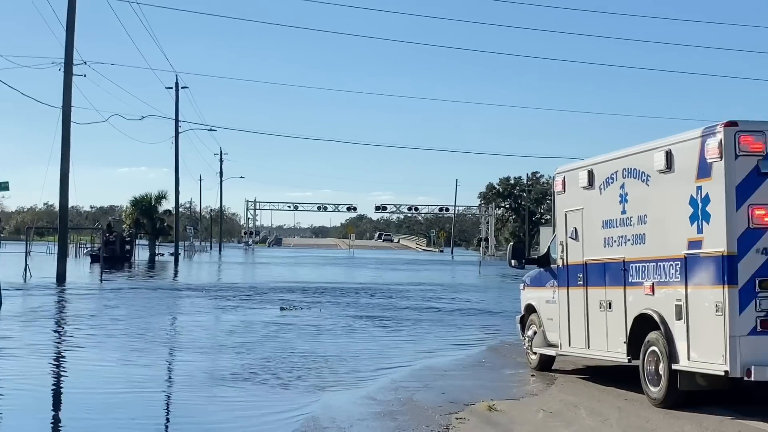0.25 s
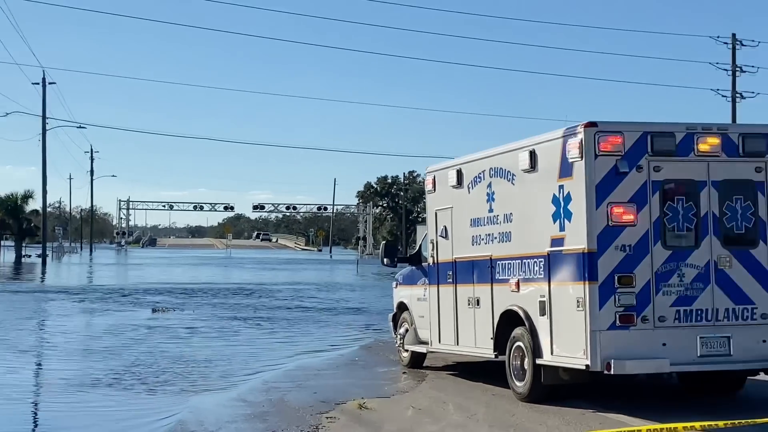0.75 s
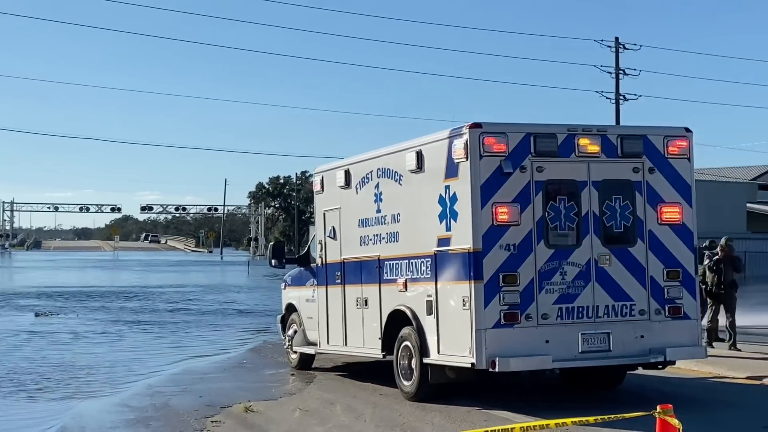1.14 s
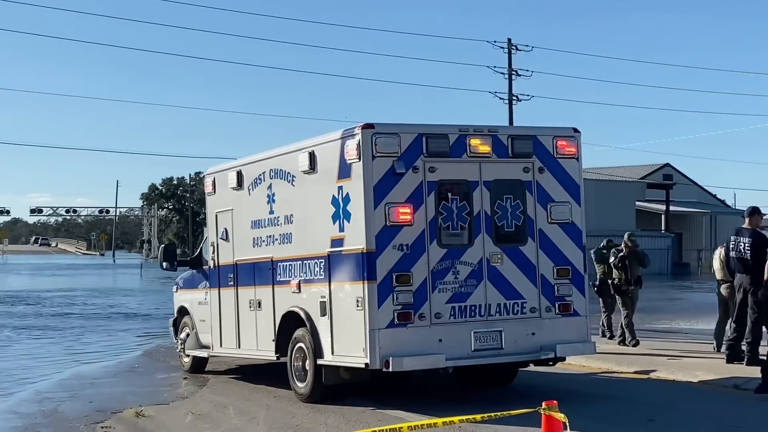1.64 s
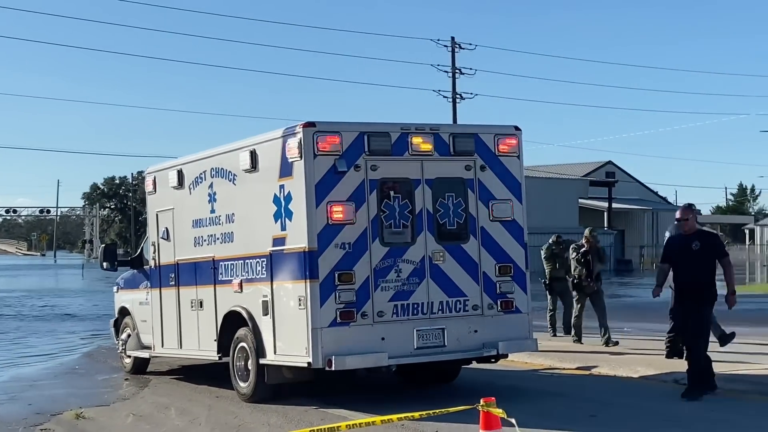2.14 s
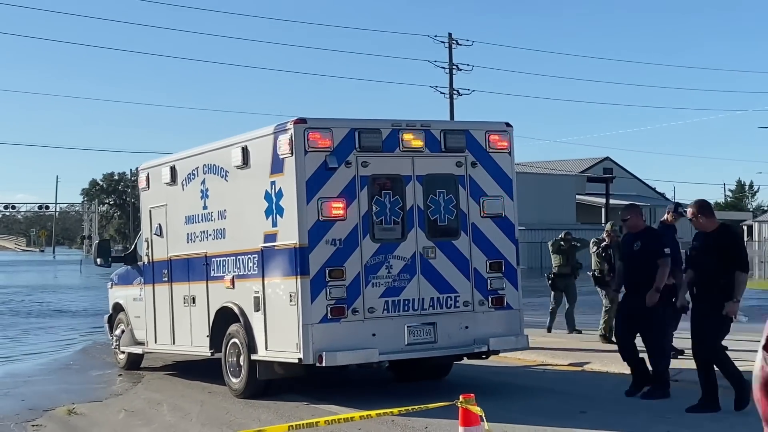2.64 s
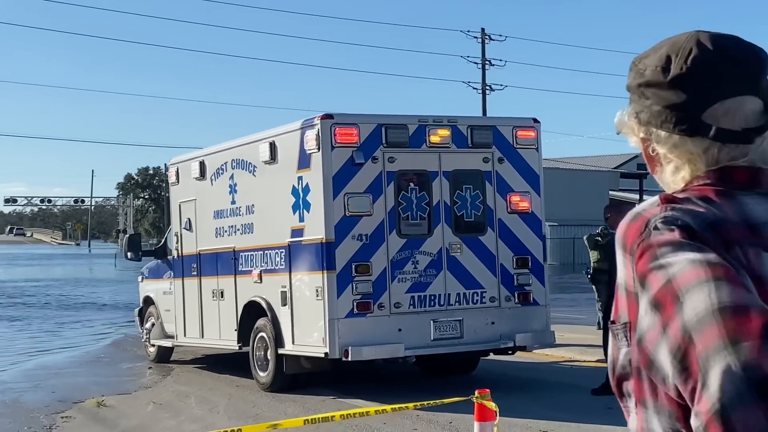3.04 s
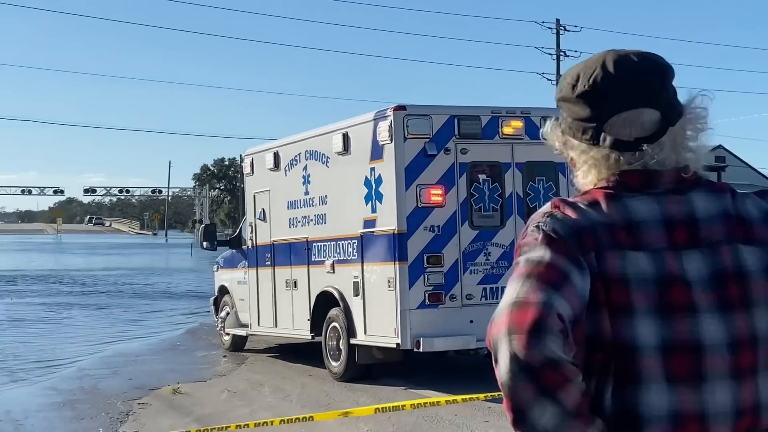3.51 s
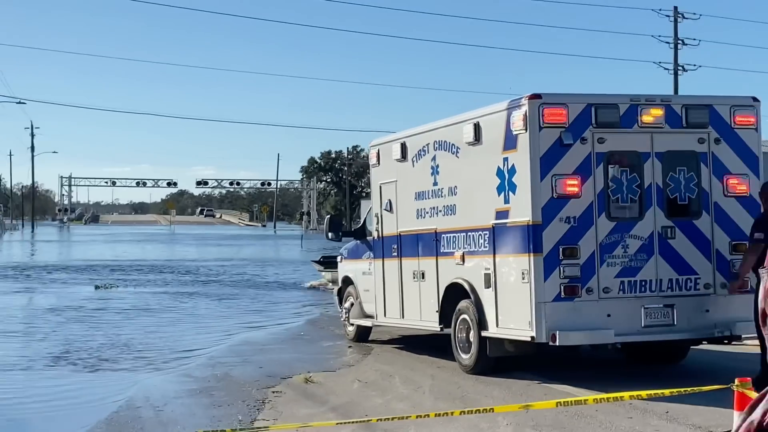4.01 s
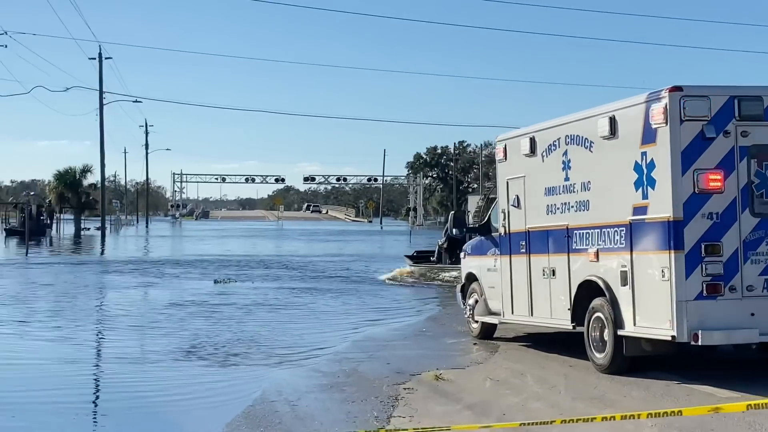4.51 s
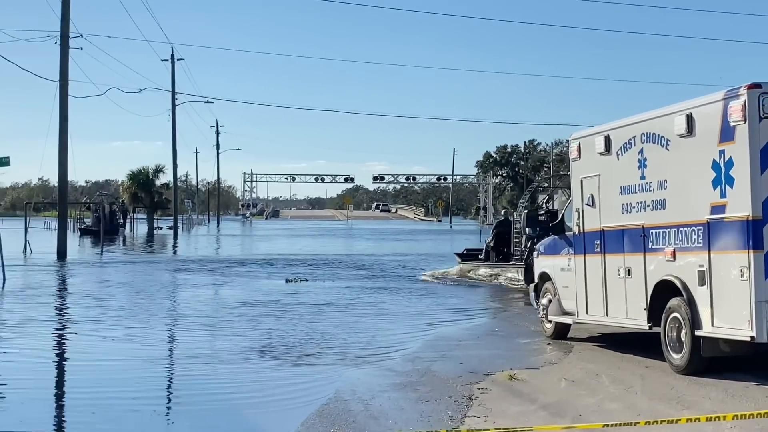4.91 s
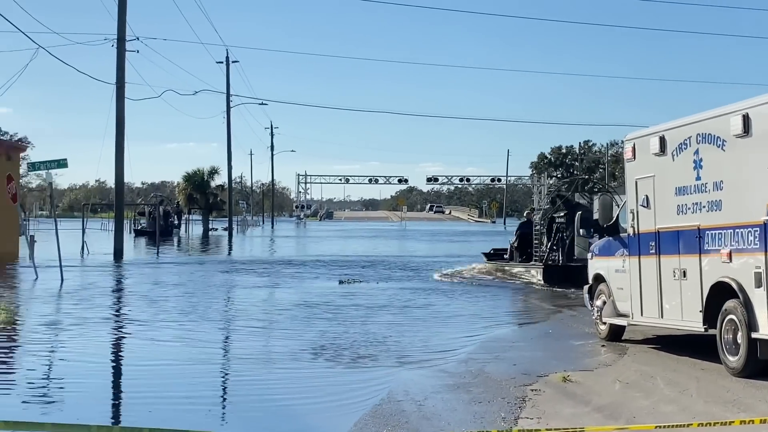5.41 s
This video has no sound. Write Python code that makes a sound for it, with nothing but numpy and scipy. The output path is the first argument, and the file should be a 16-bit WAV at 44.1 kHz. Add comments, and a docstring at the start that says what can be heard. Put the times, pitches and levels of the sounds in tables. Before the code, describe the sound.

An airboat revs and runs off across floodwater, heard loudly from the shore in open-air stereo. At 0 s the open-piped V8 is already running; a stab of throttle makes the exhaust bark around 0.2 s, and the ragged, sputtering note climbs rapidly until about 1.2 s. Churning low air and a strong blade throb join a burst of rasp near 0.55 s. From 1.2 to 2 s it holds a smoother, full-power roar with bright buzzing rasp and broad blade hiss. Between 2 and 3 s the throttle eases, pitch sinking slightly, rasp softening and a deep boom strengthening. The hiss is duller while a parked vehicle masks the boat. From 3 to 5.6 s a steady cruising drone continues, wavering with reflections. After about 4.2 s rough, surging propeller wash emerges; near 4.6 s the low end drops slightly, and the treble opens by 5 s, still roaring at the end.

```python
"""Airboat leaving across floodwater

Heard from the shore: an airboat opens its throttle, revs up, eases to cruising and runs off.
A V8 with open pipes drones in multiples of its firing cycle and drives a geared three-blade propeller.
Exhaust gas roars in time with the cycle, the blades hiss, and their wash grows as the stern swings round.
Vehicles, walls and water scatter the sound to a stereo microphone, so single tones swell and fade."""
import sys
import numpy as np
from scipy import signal
from scipy.fft import rfft, irfft
from scipy.io import wavfile
from scipy.ndimage import uniform_filter1d, minimum_filter1d

SR = 44100
rng = np.random.default_rng(int(sys.argv[2]) if len(sys.argv) > 2 else 0)


def wav_out(sig):
    """Save sig, one row per channel (or a flat mono array), as 16-bit PCM at SR to the path in sys.argv[1]."""
    wavfile.write(sys.argv[1], SR, np.round(np.clip(np.atleast_2d(sig).T, -1, 1) * 32767).astype(np.int16))


N = 249606
TIME = np.arange(N) / SR
FREQS = np.fft.rfftfreq(N, 1 / SR)

# Spread of the reflections over the stereo field. Each row: pitch in Hz, side against mid in dB.
WIDTH = [(60, -24), (180, -25), (380, -9.5), (650, -7), (1500, -5), (2000, -11), (2600, -98), (6500, -59),
         (8200, -72), (15000, -41)]
# Air and spray at the blade tips. Each row: pitch in Hz, relative density in dB per Hz.
HISS_COLOUR = [(700, -56), (1900, 2.5), (2700, 1), (3200, 2.5), (4300, 3), (5500, 0.5), (7000, 0),
               (9000, -2.5), (11000, -1), (13000, -3), (15500, -6.5)]
# Top of the hiss, duller while a parked vehicle hides the boat. Each row: time in seconds, gain in dB.
OPENNESS = [(0, -2.5), (.7, -5.5), (1.3, -1), (2.25, -7.5), (3.3, -5), (4.4, -5.5), (5, -1), (5.66, -0.5)]
# Low churn behind the propeller. Each row: pitch in Hz, relative density in dB per Hz.
CHURN_COLOUR = [(25, -48), (40, -25), (60, -8.5), (110, -17), (200, -24), (300, -20), (400, -20.5),
                (600, -32), (1500, -92)]
# Wash from the stern. Each row: pitch in Hz, relative density in dB per Hz.
WASH_COLOUR = [(350, -10), (720, 1), (1050, 0), (1600, -9), (2200, -8), (3500, -32)]
# Propeller tones in the wash. Each row: multiple of the blade rate, level in dB before wavering.
STERN_TONES = [(5, -33.5), (10, -36.5), (11, -39)]
# Overtones of the blades. Each row: multiple of the blade rate, base level in dB at full throttle,
# base level in dB when cruising.
BLADE_OVERTONES = [(3, -36.5, -31.5), (4, -28.5, -35), (5, -33.5, -34), (6, -34.5, -40.5), (7, -38, -43.5),
                   (8, -35.5, -41), (9, -48, -49.5), (10, -38, -47), (11, -47, -59), (12, -46.5, -46.5)]
# Short swells of rasp, each in one band. Each row: time in seconds, centre in Hz, peak level in dB,
# width in seconds.
RASP_SWELLS = [(2.2, 1590, -31, 0.15), (2.55, 1870, -34.5, .14), (2.7, 1045, -34, 0.32),
               (2.95, 1520, -34.5, 0.11), (3.32, 990, -36, 0.21), (3.36, 1560, -38.5, .12),
               (3.72, 1620, -40.5, 0.21), (3.9, 1240, -35.5, 0.076), (4.28, 1004, -37, 0.19),
               (4.5, 1770, -42, 0.22), (4.68, 820, -34, 0.092), (5.3, 725, -32, 0.13),
               (5.6, 1320, -36, 0.15)]
# Turbulent exhaust jets. Each row: pitch in Hz, relative density in dB per Hz.
ROAR_COLOUR = [(150, 2.5), (330, -14), (480, 3.5), (580, 5), (700, 0.5), (1100, -27), (2500, -96)]
# Exhaust rasp. Each row: pitch in Hz, relative density in dB per Hz.
RASP_COLOUR = [(400, -3), (750, 5), (900, 2.5), (1020, 6.5), (1160, 2.5), (1300, 3.5), (1600, 1),
               (2100, -5.5), (3000, -5.5), (6000, -23)]
# Bright band in the rasp that shifts in pitch and strength. Each row: time in seconds, centre in Hz,
# gain in dB.
GLARE = [(0, 1060, 15), (.6, 1230, 4), (1.2, 1900, 1.5), (2.2, 1710, 2.5), (2.6, 1720, 10),
         (3.3, 1222, 2.5), (5.66, 760, -2)]
# Load on engine and blades; roar and pipe tones swell with it too. Each row: time in seconds,
# base level of the rasp in dB, base level of the hiss in dB.
LOAD = [(0.03, -32, -33), (0.25, -26.5, -33), (0.5, -25, -29.5), (0.55, -19, -30.5), (0.62, -22, -27.5),
        (0.72, -22, -28.5), (1.1, -23, -29.5), (1.3, -24.7, -32.5), (1.59, -26.7, -33.5), (1.9, -26, -31.5),
        (2.33, -26.5, -31), (2.7, -30.5, -34.5), (3.3, -32, -37), (3.5, -35.5, -38.5), (4.21, -30, -35.5),
        (5.01, -34, -35), (5.58, -29.5, -32.5)]
# Orders sounded by uneven firing. Each row: multiple of the cycle, base level in dB at full throttle,
# when cruising, and at the first stab of the throttle.
UNEVEN = [(2, -36, -32, -28), (3, -18, -25, -16), (4, -35, -52, -24), (6, -26, -24, -32),
          (7, -41, -43, -21), (10, -28, -34.5, -31), (11, -29.5, -25.5, -13.5), (12, -34.5, -38, -23),
          (13, -33, -23.5, -26), (14, -35, -39, -27), (15, -32, -42, -26), (17, -30.5, -38.5, -41),
          (18, -40, -30, -47.5), (19, -40, -39, -46), (20, -31.5, -42, -32), (21, -44, -38, -34),
          (23, -48, -53, -40), (25, -40, -45, -37)]
# Single orders swell or drop out as reflections reinforce or cancel them. Each row: time in seconds,
# multiple of the cycle, change in dB, width in seconds.
FADES = [(0.03, 15, 13, .05), (0.15, 11, -15, .022), (0.15, 7, 8, .05), (0.2, 11, 7, 0.082),
         (0.36, 11, -9, .04), (0.35, 13, 9, .07), (0.2, 9, -14, 0.1), (0.47, 9, -6, 0.073),
         (0.5, 8, -3, 0.22), (0.62, 9, 3.5, 0.069), (0.78, 8, 1, 0.1), (0.9, 6, -18, 0.13),
         (1.0, 12, 10.5, 0.21), (1.02, 8, 3.5, 0.18), (1.3, 9, -16, 0.11), (1.4, 16, 5, 1),
         (1.5, 8, -4.5, 0.47), (1.95, 9, 3.5, 0.19), (2.15, 14, 6.5, 0.43), (2.35, 6, 6.5, 0.29),
         (2.42, 11, 6, 0.093), (2.95, 11, -8, 0.2), (2.42, 8, -7, 0.053), (2.55, 16, -4.5, 0.12),
         (2.68, 9, -3, 0.13), (2.85, 13, -33, 0.26), (3.8, 3, 2, 0.33), (3.88, 9, 5, 0.16),
         (3.9, 17, 10.5, 0.56), (3.95, 13, -8, 0.25), (4.35, 8, 2, 0.24), (4.37, 9, -9.5, 0.074),
         (4.35, 13, 3, 0.12), (4.8, 9, -5, 0.15), (4.85, 8, -2.5, 0.21), (4.5, 6, -14, 0.46),
         (4.7, 18, 5, 0.19), (4.9, 16, -18, 0.21), (5.2, 9, -4.5, 0.19), (5.4, 13, -10, 0.14),
         (5.4, 12, 10.5, 0.26)]
# The booming fifth order. Each row: time in seconds, base level in dB.
BOOM = [(0, -17), (.17, -30), (.38, -15), (.7, -20), (1, -27.5), (1.5, -19), (2, -21.5), (2.35, -15),
        (2.8, -12.5), (3.08, -15), (3.25, -14), (4.4, -13), (5.66, -14.3)]
# The eight firings, the order that beats with them, and two overtones. Each row: multiple of the cycle,
# base level in dB at full throttle, when cruising, start of easing in seconds, dB per dB of rasp.
PIPE_TONES = [(8, -20.5, -20, 2.9, 0.47), (9, -25.5, -20.5, 2.8, 0.06), (16, -28, -27.5, 4.7, 0),
              (24, -31.5, -46, 1.44, 1)]
# Engine speed. Each row: time in seconds, engine cycles per second.
SPEED = [(0.0, 23.0), (0.09, 23.5), (0.28, 26.15), (0.5, 29.9), (0.72, 32.7), (0.88, 33.8), (1.06, 34.3),
         (1.2, 34.6), (1.8, 33.7), (2.18, 34.0), (2.32, 33.9), (2.61, 33.1), (2.92, 31.8), (3.1, 31.4),
         (3.53, 31.3), (4.0, 31.8), (4.96, 31.4), (5.66, 31.9)]

BLADE_ORDER = 3 * 2 / 2.685  # blade passes a cycle: three blades, two crank turns, reduction gear
BOOM_ORDER = 5  # multiple of the cycle
FULL_SPEED, CRUISE_SPEED = 34, 31.6  # engine cycles per s
USUAL_RASP_DB, USUAL_HISS_DB = -28, -32
KICK_S, KICK_WIDTH_S = 0.19, 0.3  # the first stab of the throttle makes the pipes bark
CATCH_S, CATCH_TAKES_S = 0.63, 0.61  # combustion is ragged until the engine catches up with the throttle
RAGGED_REVVING, RAGGED_RUNNING = .7, .09  # roughness 0-1
BITE_S, BITE_TAKES_S = 0.77, 0.24  # the blades churn in stalled air until they bite
HIDDEN_S, HIDING_S = 1.5, 0.76  # the boat slips behind a parked vehicle
CLEAR_S, CLEARING_S = 4.1, 0.53  # and out again
EASE_S, EASE_TAKES_S = 2.02, 1.0  # the throttle eases back to cruising
STERN_S, STERN_TAKES_S = 4.2, 0.96  # the stern comes round toward the shore
LOW_DROP_S, LOW_DROP_TAKES_S = 4.62, 0.09  # the low end drops as the treble comes back
CRANK_JITTER, CRANK_JITTER_PER_S = .0015, 12  # rms cycles early or late, and how often that changes
PULSE_SCATTER = 0.45  # range in turns over which the exhaust orders stray from one pulse per cycle
CYCLE_THROB, BLADE_THROB, PUFF_SPREAD = .25, .1, .3  # depth of puffs and blade chop; how much puffs differ
PORTS_FROM_HZ, PORT_DELAY_S = 7000, .000238  # above this pitch the two microphone ports drift out of phase
EDGE_HZ = 15800


def amp(db):
    """Decibels to gain."""
    return 10 ** (np.asarray(db) / 20)


def unit(x):
    """Scales to rms 1."""
    return x / np.sqrt(np.mean(x ** 2) + 1e-20)


def levelled(x):
    """Holds the slow level at rms 1."""
    return x / np.sqrt(abs(uniform_filter1d(x ** 2, size=8000)) + 1e-20)


def curve(rows, axis=1):
    """One column of a time table at every sample."""
    rows = np.asarray(rows)
    return np.interp(TIME, rows[:, 0], rows[:, axis])


def ramp(start_s, length_s):
    """Rises from 0 to 1 over length_s."""
    return np.clip((TIME - start_s) / length_s, 0, 1)


def bump(centre_s, width_s):
    """A smooth swell from 0 to 1 and back."""
    return np.exp(-((TIME - centre_s) / width_s) ** 2)


def colour(points, hz):
    """Gain of a spectrum at the given frequencies."""
    f, db = np.transpose(points)
    return amp(np.interp(np.log(hz + 1), np.log(f), db))


def noise(points):
    """Noise of the given spectrum, rms 1."""
    white = rfft(rng.standard_normal(N))
    return unit(irfft(white * colour(points, FREQS), N))


def drift(rate):
    """Slow chance of rms 1 that changes about rate times a second."""
    size = 2048
    hz = np.fft.rfftfreq(size, N / SR / size)
    slow = irfft(rfft(rng.standard_normal(size)) / np.sqrt(1 + (hz / rate) ** 4), size)
    return np.interp(TIME, np.linspace(0, N / SR, size), unit(slow))


def tone(turns, sway, scatter=1):
    """A sine of rms 1 whose phase sways in the moving air; little scatter lines orders up into a pulse."""
    phase = turns + scatter * (rng.random() - .5)
    return np.sqrt(2) * np.cos(2 * np.pi * phase + sway * drift(rate=4.9))


def resonate(x, hz, width_hz):
    """A resonance of gain 1 that follows the curve hz."""
    turn = np.exp(2j * np.pi * np.cumsum(hz) / SR)
    r = np.exp(-np.pi * width_hz / SR)
    # shift the band down to 0 Hz, smooth it, shift it back
    return 2 * (turn * signal.lfilter([1 - r], [1, -r], x / turn)).real


def surroundings(x, scatter_s=0.059):
    """Scattered reflections differ left and right; the top octave meets one microphone port first."""
    echoes = rfft(rng.standard_normal(N) * np.exp(-TIME / scatter_s))
    side = echoes / abs(echoes) * colour(WIDTH, FREQS)
    lead = np.exp(1j * np.pi * np.maximum(FREQS - PORTS_FROM_HZ, 0) * PORT_DELAY_S)
    return irfft(rfft(x) * np.array([(1 + side) / lead, (1 - side) * lead]), N)


def reflection_db(k):
    """What order k gains or loses against its own reflection."""
    return sum(db * bump(s, width_s) for s, order, db, width_s in FADES if round(order) == k)


def hiss(turns, hiss_db=3, chop=0.02, flutter_db=0.82, top_hz=7500):
    """Air and spray torn by the blade tips; its body and its top flutter apart."""
    air = noise(HISS_COLOUR)
    top = irfft(rfft(air) * FREQS ** 4 / (FREQS ** 4 + top_hz ** 4), N)
    body = (air - top) * amp(flutter_db * drift(rate=24))
    top = top * amp(curve(OPENNESS) + flutter_db * drift(rate=6.2))
    beat = 1 + chop * np.cos(2 * np.pi * BLADE_ORDER * turns)
    return amp(curve(LOAD, axis=2) + hiss_db) * beat * (body + top)


def slipstream(speed, churn_db=-23.5, stall_db=6, cruise_db=-2.0, decade_db=20, drop_db=-1.5):
    """Low churn behind the propeller grows with speed and gains weight while the blades are stalled."""
    stalled = 1 - ramp(BITE_S, BITE_TAKES_S)
    level = churn_db + stall_db * stalled
    level += cruise_db * ramp(EASE_S, EASE_TAKES_S) + drop_db * ramp(LOW_DROP_S, LOW_DROP_TAKES_S)
    return amp(level + decade_db * np.log10(speed / FULL_SPEED)) * noise(CHURN_COLOUR)


def puffs(turns):
    """A puff of gas in every cycle, each of its own strength, chopped by the blades; rms 1."""
    strength = (1 + PUFF_SPREAD * rng.standard_normal(N))[turns.astype(int)]
    puff = np.sin(np.pi * turns) ** 4
    chop = BLADE_THROB * np.cos(2 * np.pi * BLADE_ORDER * turns)
    return unit(1 + 1.5 * CYCLE_THROB * strength * puff + chop)


def stern(turns, wash_db=-32, chop=0.14, waver_db=3.5):
    """As the stern swings shoreward, the propeller's rough, surging wash and its overtones come through."""
    passes = BLADE_ORDER * turns
    surges = unit(amp(3 * np.tanh(drift(rate=18))))
    beat = 1 + chop * np.cos(2 * np.pi * passes)
    out = amp(wash_db) * noise(WASH_COLOUR) * surges * puffs(turns) * beat
    for order, db in STERN_TONES:
        out += amp(db + waver_db * drift(rate=4)) * tone(round(order) * passes, sway=0.8)
    return np.sqrt(ramp(STERN_S, STERN_TAKES_S)) * out


def propeller(speed, turns, blade_db=-16.5, blade_cruise_db=-5.0, blade_drop_db=-4, octave_db=-31,
              octave_cruise_db=-5, octave_stall_db=18, decade_db=60, waver_db=2.0):
    """Blade-passing tones grow with tip speed and drop when cruising; stalled blades stress the octave.
    The overtones fall between the exhaust orders and beat with them into a coarse roar."""
    passes = BLADE_ORDER * turns
    tip_db = decade_db * np.log10(speed / FULL_SPEED)
    eased, dropped = ramp(EASE_S, EASE_TAKES_S), ramp(LOW_DROP_S, LOW_DROP_TAKES_S)
    stalled = 1 - ramp(BITE_S, BITE_TAKES_S)
    blade_level = blade_db + tip_db + blade_cruise_db * eased + blade_drop_db * dropped
    octave_level = octave_db + tip_db + octave_cruise_db * eased + octave_stall_db * stalled
    out = amp(blade_level) * tone(passes, sway=0.067)
    out += amp(octave_level) * tone(2 * passes, sway=0.03)
    for order, full_db, cruise_db in BLADE_OVERTONES:
        level = (full_db + tip_db) * (1 - eased) + cruise_db * eased + waver_db * drift(rate=1.8)
        out += amp(level) * tone(round(order) * passes, sway=0.25)
    return out


def rasp_swells(turns, width_share=0.042, flutter_db=4):
    """Short swells of throbbing, fluttering rasp, each in one band."""
    gas, out = rfft(rng.standard_normal(N)), np.zeros(N)
    for s, hz, db, width_s in RASP_SWELLS:
        band = irfft(gas / (1 + ((FREQS - hz) / (width_share * hz)) ** 2), N)
        band = unit(band * amp(flutter_db * np.tanh(drift(rate=35))))
        out += amp(db) * bump(s, width_s) * band
    return out * puffs(turns)


def roar(turns, roar_db=-30, load_share=1.0, hidden_db=-7):
    """Turbulent exhaust jets under the drone swell with the load and sink while the boat is hidden."""
    hidden = ramp(HIDDEN_S, HIDING_S) - ramp(CLEAR_S, CLEARING_S)
    level = roar_db + load_share * (curve(LOAD, axis=2) - USUAL_HISS_DB) + hidden_db * hidden
    return amp(level) * noise(ROAR_COLOUR) * puffs(turns)


def kick():
    """Strength of the first stab of the throttle, 0-1."""
    return bump(KICK_S, KICK_WIDTH_S)


def raggedness():
    """Roughness of the combustion, 0-1."""
    return RAGGED_REVVING + (RAGGED_RUNNING - RAGGED_REVVING) * ramp(CATCH_S, CATCH_TAKES_S)


def stumble(depth):
    """Irregular swings in the strength of one order, deeper while combustion is ragged."""
    ragged = depth * raggedness() * (1 - 0.5 * kick())
    return (1 + ragged * drift(rate=13.0)) / np.sqrt(1 + ragged ** 2)


def rasp(speed, turns, lines_db=-3.0, gas_db=-3.0, firing_db=2.5, fade_db=5.0, grain_db=3, sputter_db=-1.5,
         glare_width_hz=300):
    """High orders, those below 44 favouring multiples of the firing rate, in gas throbbing with the cycle."""
    glare_hz, glare = curve(GLARE, axis=1), amp(curve(GLARE, axis=2)) - 1
    lines = np.zeros(N)
    for k in range(26, 70):
        near_firing = np.cos(2 * np.pi * k / 8) * (k < 44)
        level = amp(firing_db * near_firing + fade_db * drift(rate=5.3))
        level *= 1 + glare / (1 + (2 * (k * speed - glare_hz) / glare_width_hz) ** 2)
        lines += level * colour(RASP_COLOUR, k * speed) * tone(k * turns, sway=0.5)
    gas = noise(RASP_COLOUR)
    gas = gas + glare * resonate(gas, glare_hz, glare_width_hz)
    gas = levelled(gas) * amp(grain_db * np.tanh(drift(rate=220)))
    mix = amp(lines_db) * levelled(lines) + amp(gas_db) * gas
    sputter = sputter_db * raggedness() * drift(rate=34)
    return amp(curve(LOAD, axis=1) + sputter) * puffs(turns) * mix


def drone(turns, drone_db=0, fade_db=2.5, cruise_share=0.79, blunt_db=16):
    """Uneven firing within each bank sounds the remaining multiples of the cycle."""
    eased = cruise_share * ramp(EASE_S, EASE_TAKES_S)
    sharpness = -blunt_db * raggedness() ** 2
    out = np.zeros(N)
    for order, full_db, cruise_db, kick_db in UNEVEN:
        k = round(order)
        upper = np.clip((k - 11) / 5, 0, 1)
        level = full_db + (cruise_db - full_db) * eased + upper * sharpness + reflection_db(k)
        level += (kick_db - level) * kick()
        level += fade_db * (1 + upper) / 2 * drift(rate=2.3)  # shorter waves fade more over the water
        voice = tone(k * turns, sway=0.013 * k, scatter=PULSE_SCATTER)
        out += amp(level + drone_db) * stumble(depth=0.59 + 3 * upper) * voice
    return out


def pipe_db(hz, centre_hz=276, width_hz=19, peak_db=14.0):
    """The main resonance of the exhaust pipes; each order swells as it sweeps through."""
    detune = (hz - centre_hz) / width_hz
    return peak_db / (1 + detune ** 4)


def pipe_swell_db(k, speed, kick_lift=0.14):
    """What order k gains from the pipe resonance while the engine is off its settled speed."""
    settled = FULL_SPEED + (CRUISE_SPEED - FULL_SPEED) * ramp(EASE_S, EASE_TAKES_S)
    return pipe_db(k * speed) * (1 + kick_lift * kick()) - pipe_db(k * settled)


def firing(speed, turns, boom_db=3.0, boom_rough=0.52, bark_sway=0.25, choke_db=24, pipe_share=0.56,
           fade_db=1.23, kick_db=7, drop_db=-3):
    """The strongest exhaust tones: the boom, the eight firings of each cycle and their overtones."""
    boom = tone(BOOM_ORDER * turns, sway=0.023, scatter=PULSE_SCATTER)
    out = amp(curve(BOOM) + boom_db) * stumble(depth=boom_rough) * boom
    effort_db = curve(LOAD, axis=1) - USUAL_RASP_DB
    for order, full_db, cruise_db, ease_s, share in PIPE_TONES:
        k, eased = round(order), ramp(ease_s, EASE_TAKES_S)
        level = (full_db + share * effort_db) * (1 - eased) + cruise_db * eased
        level += pipe_share * pipe_swell_db(k, speed) + reflection_db(k) + fade_db * drift(rate=1.0)
        if k < 16:
            level += kick_db * kick() + drop_db * ramp(LOW_DROP_S, LOW_DROP_TAKES_S)
            depth, sway = 0.83, 0.0045 * k
        else:  # ragged firing blunts the overtones
            level -= choke_db * raggedness() ** 2
            depth, sway = 2.2, bark_sway
        out += amp(level) * stumble(depth) * tone(k * turns, sway, scatter=PULSE_SCATTER)
    return out


def scene():
    """One engine speed drives the layers; the crank runs a little unevenly."""
    speed = curve(SPEED)
    turns = np.cumsum(speed) / SR + CRANK_JITTER * drift(rate=CRANK_JITTER_PER_S)
    air = hiss(turns) + slipstream(speed) + stern(turns) + propeller(speed, turns)
    exhaust = rasp_swells(turns) + roar(turns) + rasp(speed, turns) + drone(turns) + firing(speed, turns)
    return surroundings(air + exhaust)


def record(dry):
    """A fast limiter holds the peaks under full scale; then the band limit."""
    ceiling = .96
    room = np.minimum(1, ceiling / (abs(dry).max(0) + 1e-9))
    held = dry * uniform_filter1d(minimum_filter1d(room, size=120), size=120)
    lowpass = signal.firwin(511, EDGE_HZ, window=("kaiser", 9), fs=SR)
    return signal.oaconvolve(held, lowpass[None], "same")


dry = scene()
out = record(dry)
wav_out(out)
```